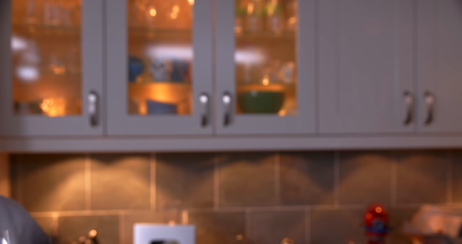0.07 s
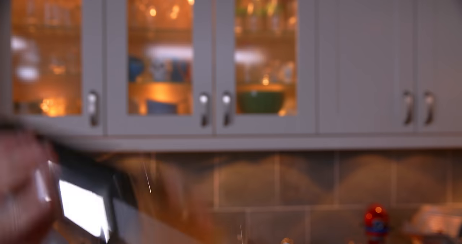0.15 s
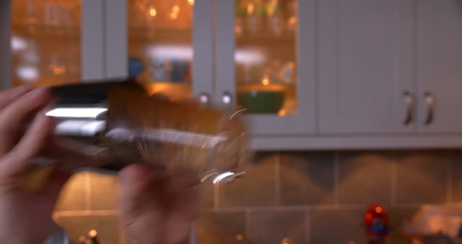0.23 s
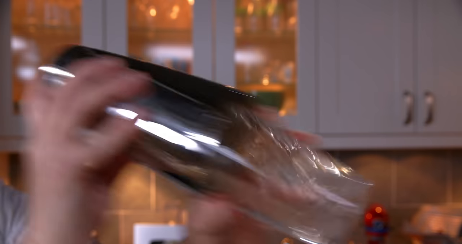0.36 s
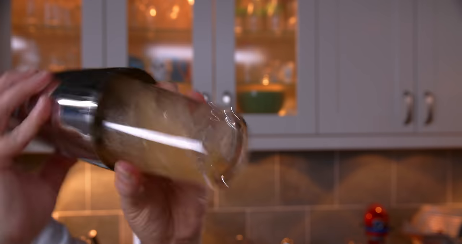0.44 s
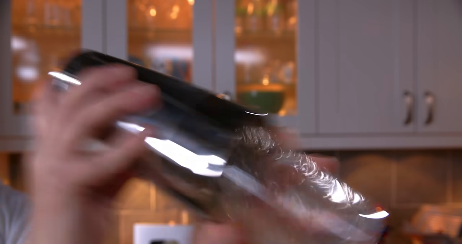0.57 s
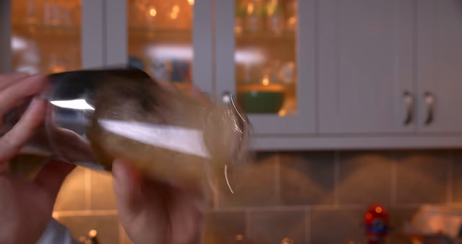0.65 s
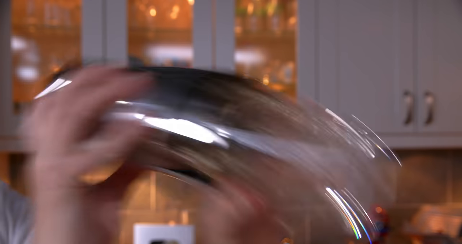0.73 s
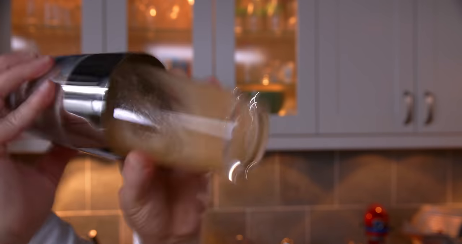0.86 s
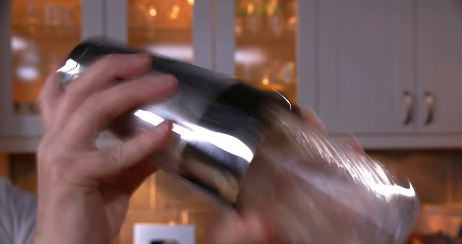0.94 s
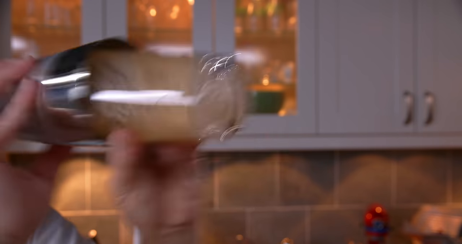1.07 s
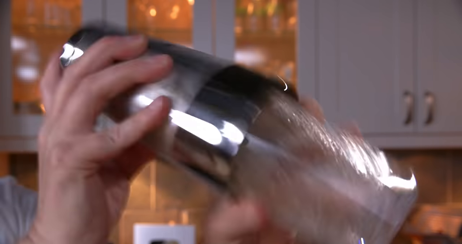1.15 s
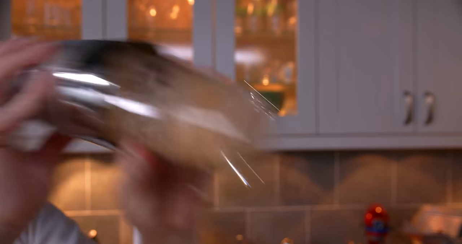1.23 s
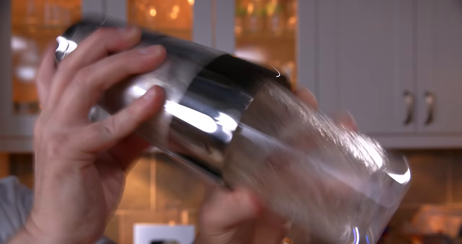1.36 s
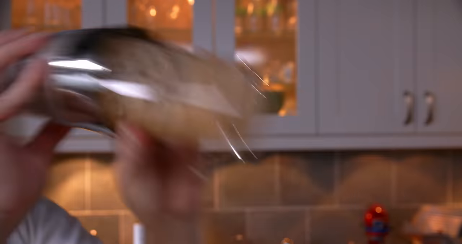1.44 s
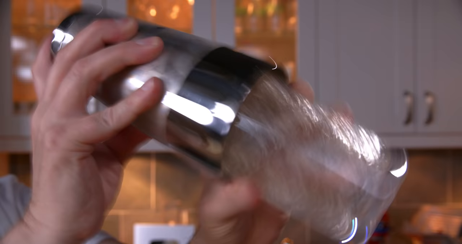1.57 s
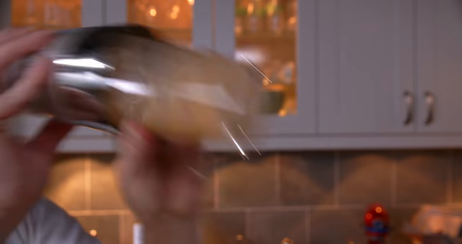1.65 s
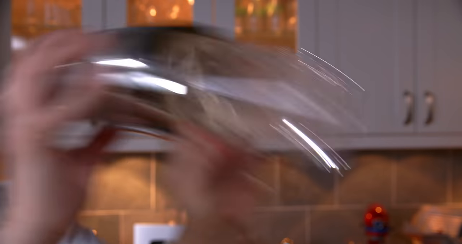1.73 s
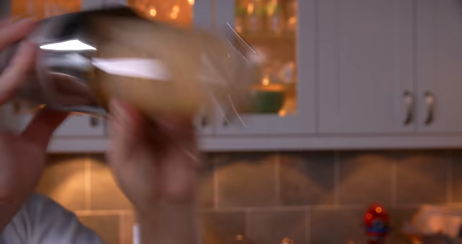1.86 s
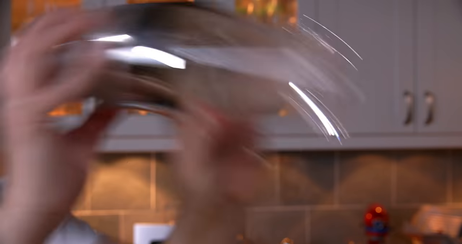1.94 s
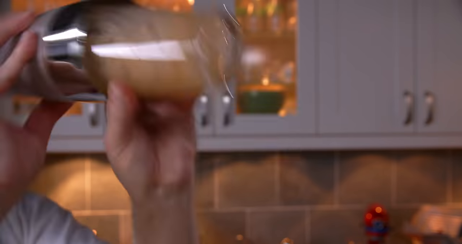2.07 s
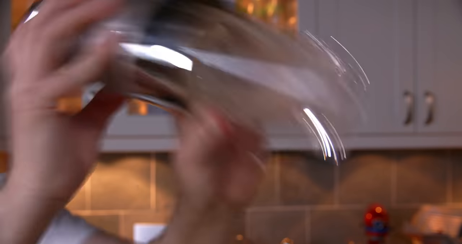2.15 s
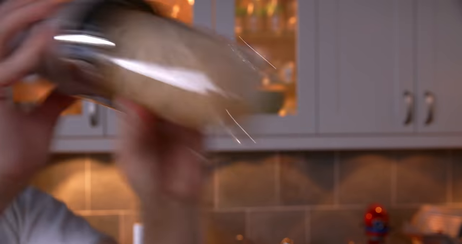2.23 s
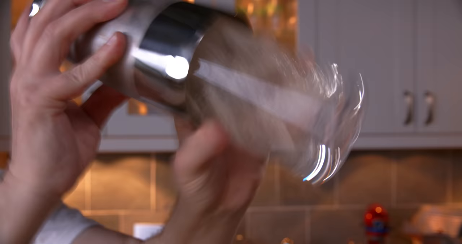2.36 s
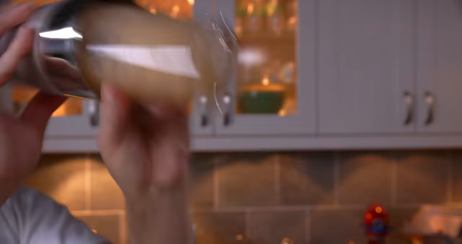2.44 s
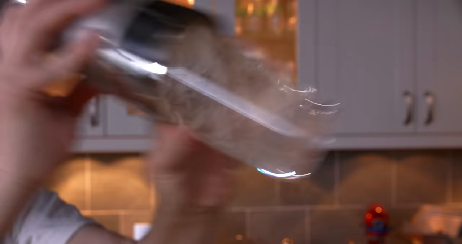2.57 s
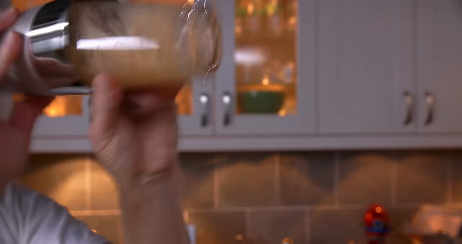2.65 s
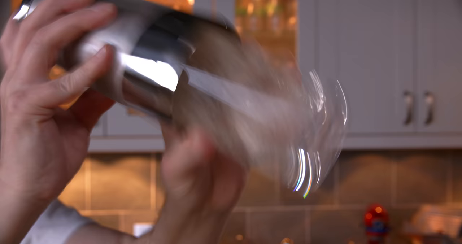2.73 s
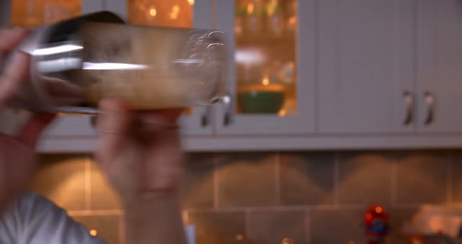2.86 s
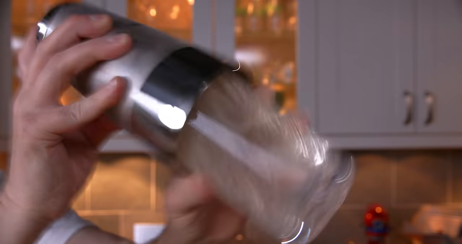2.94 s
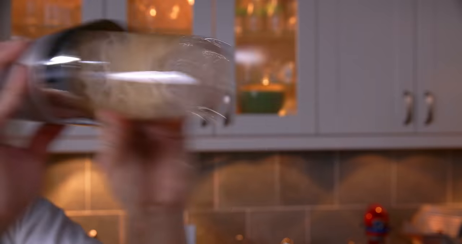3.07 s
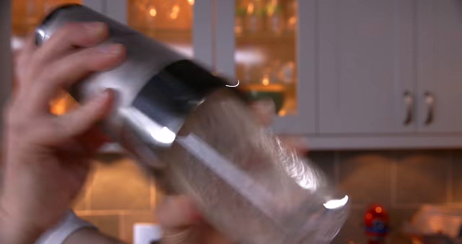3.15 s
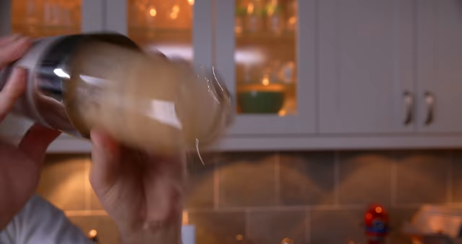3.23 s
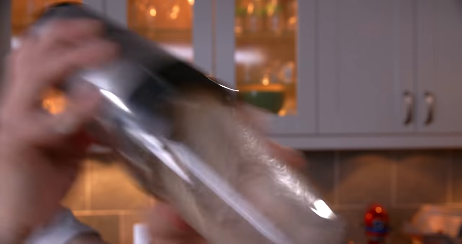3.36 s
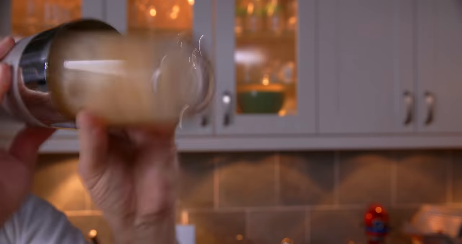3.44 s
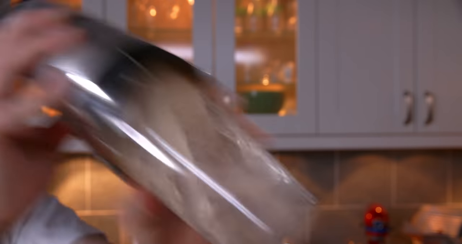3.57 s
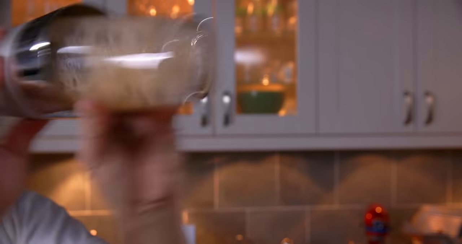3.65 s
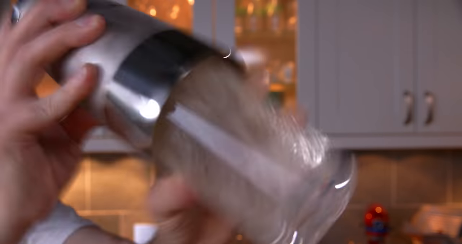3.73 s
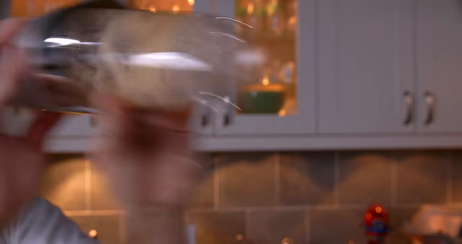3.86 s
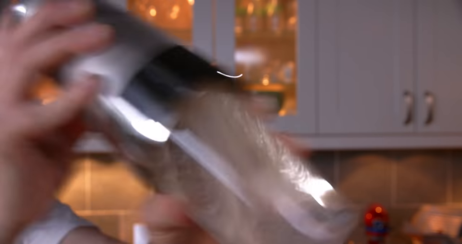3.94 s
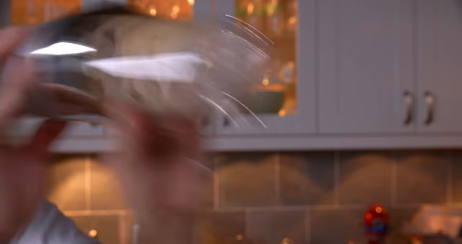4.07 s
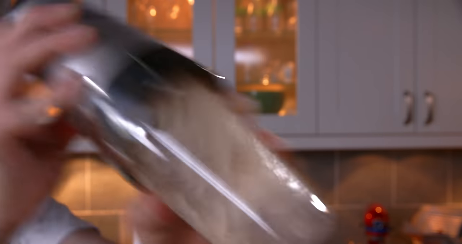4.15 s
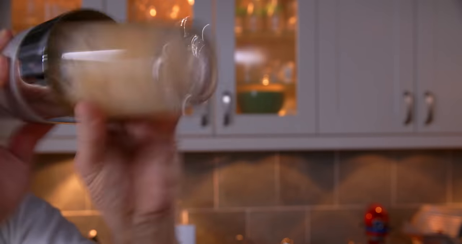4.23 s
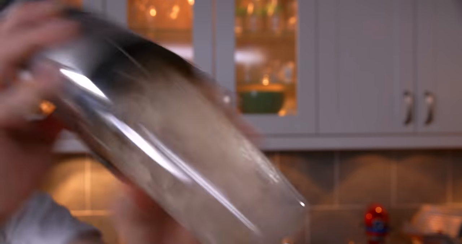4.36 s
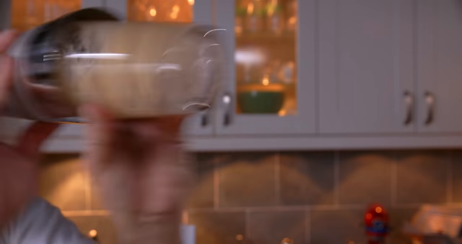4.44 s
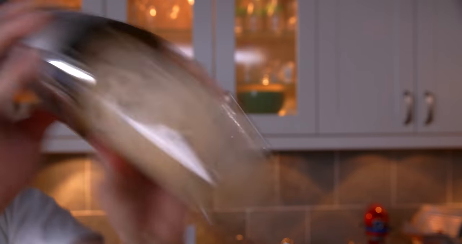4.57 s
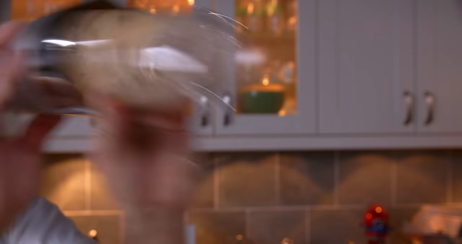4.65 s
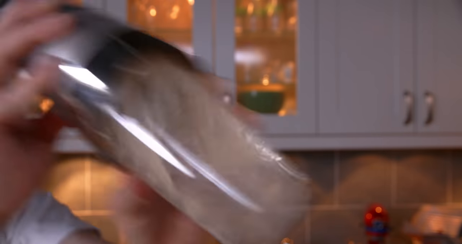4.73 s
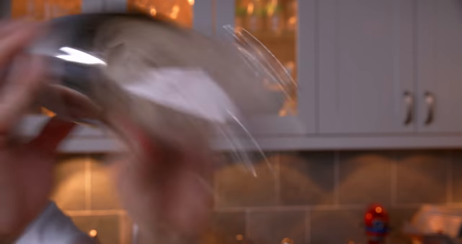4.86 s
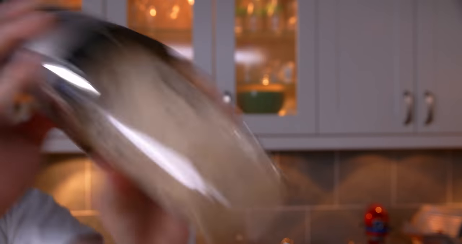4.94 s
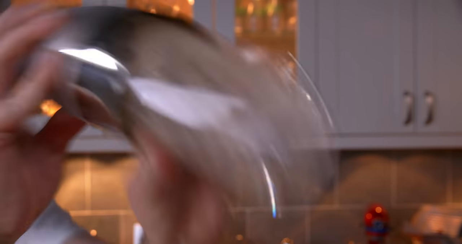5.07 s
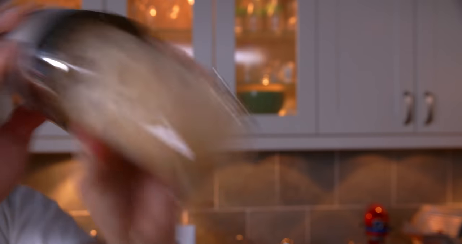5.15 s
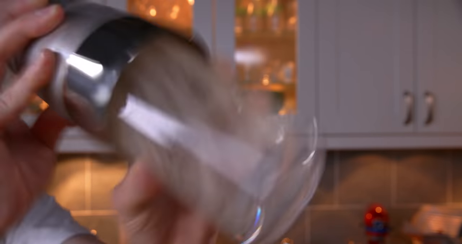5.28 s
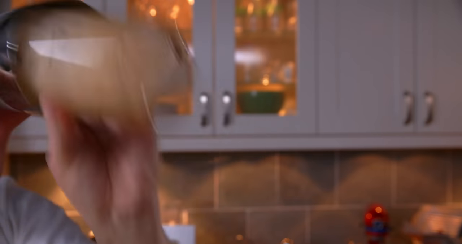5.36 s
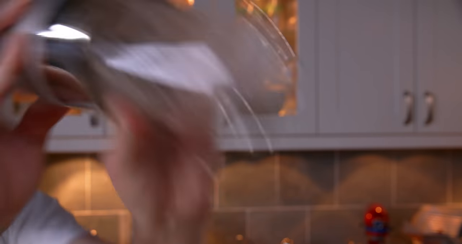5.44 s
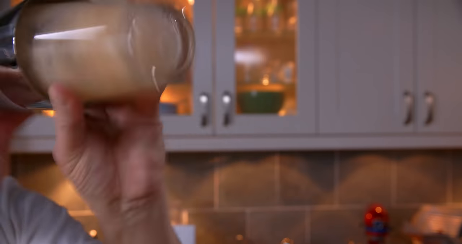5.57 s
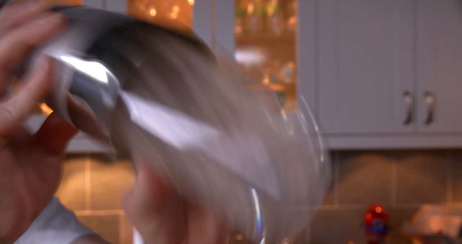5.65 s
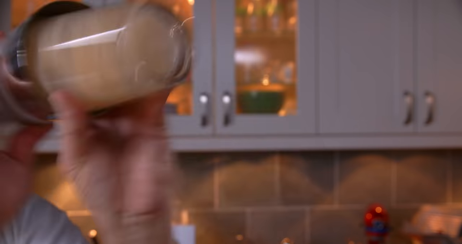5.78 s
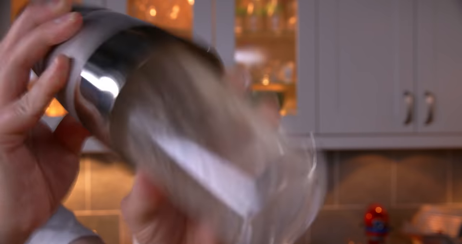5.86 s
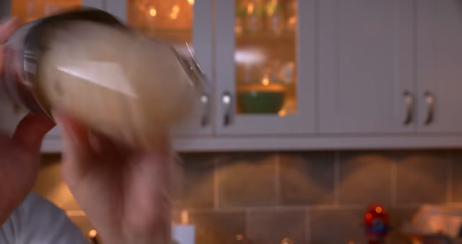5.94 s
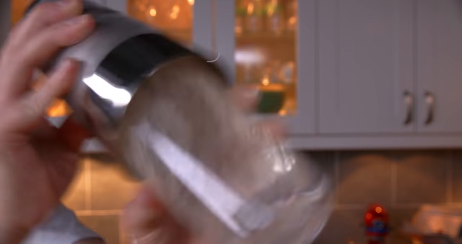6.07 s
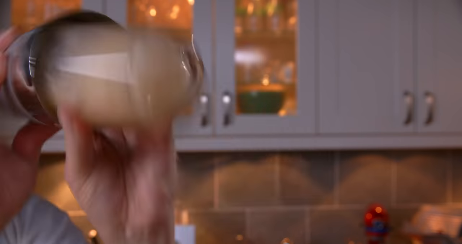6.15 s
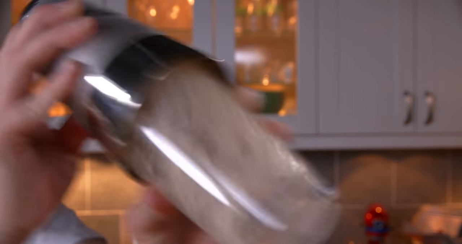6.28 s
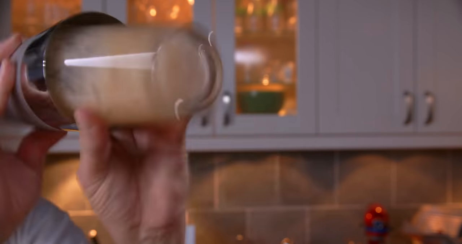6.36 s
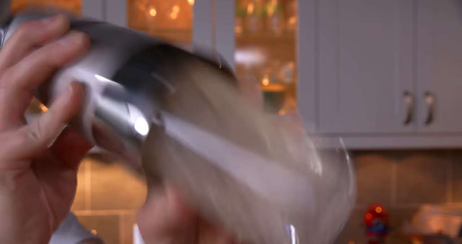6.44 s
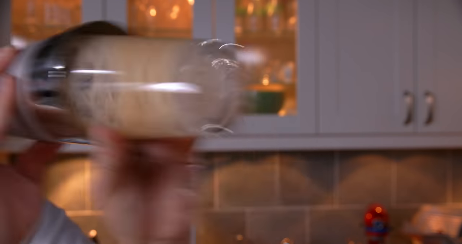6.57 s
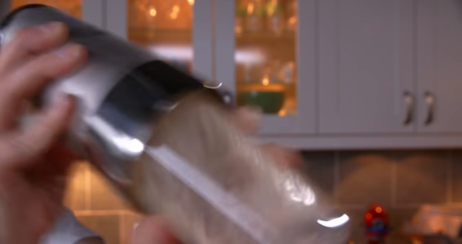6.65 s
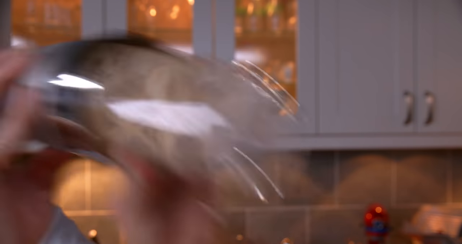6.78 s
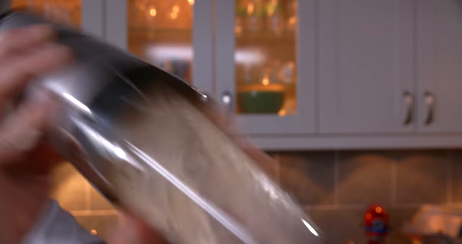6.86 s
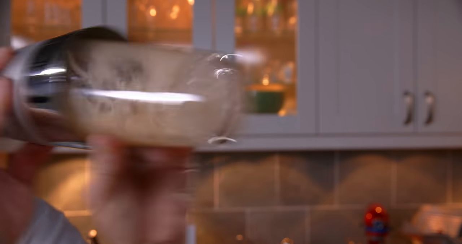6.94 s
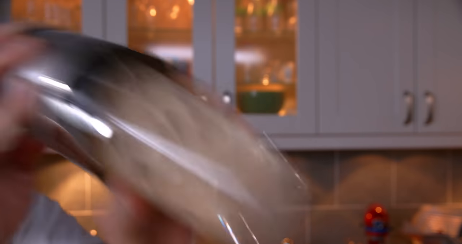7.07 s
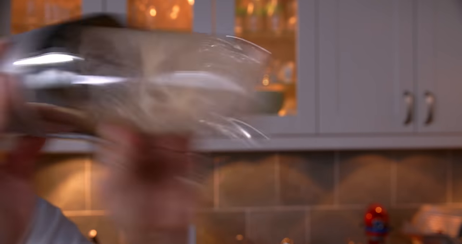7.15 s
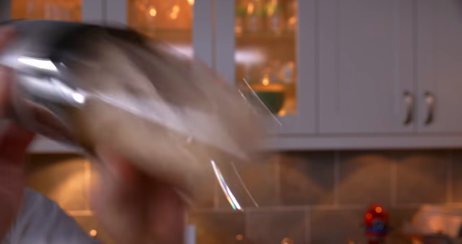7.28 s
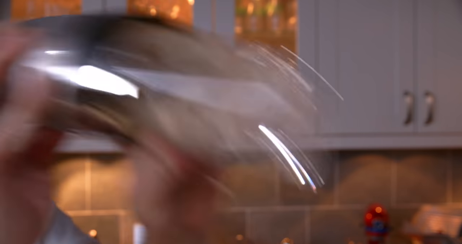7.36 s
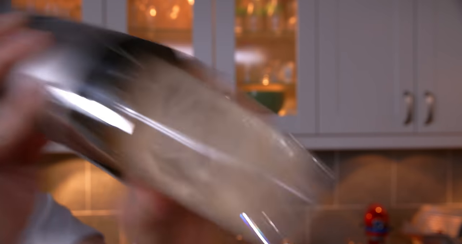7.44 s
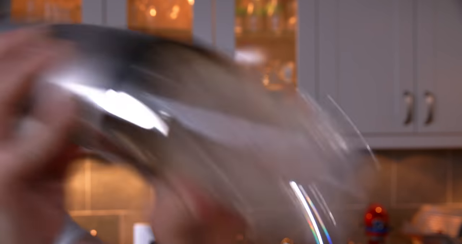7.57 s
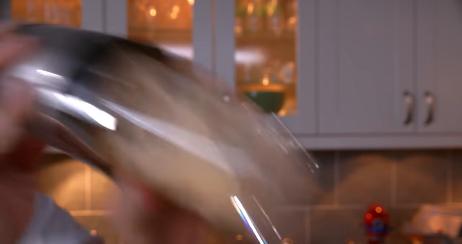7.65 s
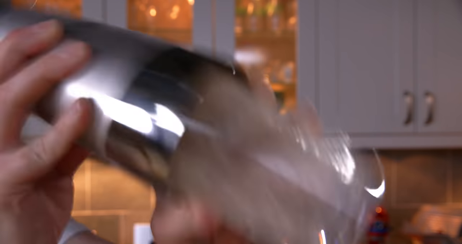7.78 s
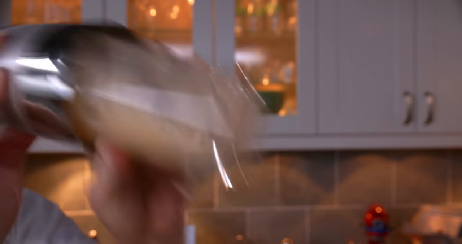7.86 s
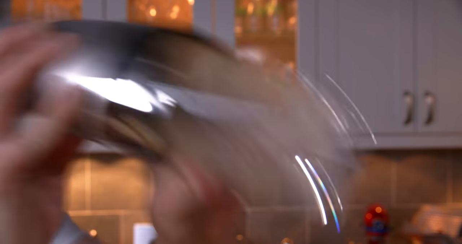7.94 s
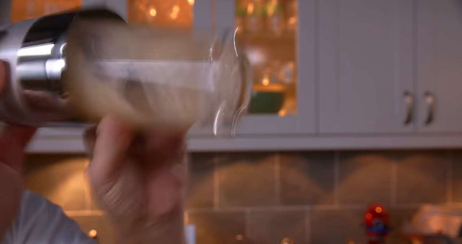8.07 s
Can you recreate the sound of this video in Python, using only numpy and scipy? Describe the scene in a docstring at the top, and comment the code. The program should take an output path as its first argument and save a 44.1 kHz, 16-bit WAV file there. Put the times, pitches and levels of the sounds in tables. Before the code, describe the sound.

After a brief quiet and a few loose slides, ice and liquid slam rapidly end to end in a hand-shaken cocktail shaker, dry and close.

```python
"""In a quiet kitchen, ice and drink are thrown from end to end of a shaker of steel tin and mixing glass,
five times a second. Each throw is a swell of small ice contacts that excite the damped modes of the walls,
with hard knocks and dull clunks as separate blows. Bands of flickering noise form the rush of the drink
and the room tone, low noise and damped 76 Hz thuds form the air moved by the arms, and feedback delays
form the reverberation."""
import sys
import numpy as np
from scipy import signal
from scipy.io import wavfile

SR = 44100
rng = np.random.default_rng(int(sys.argv[2]) if len(sys.argv) > 2 else 0)


def linear_from_db(decibels):
    """Turn decibels (scalar or array-like) into linear amplitude factors; 0 gives 1."""
    return 10 ** (np.asarray(decibels, float) / 20)


def persist_wave(psi):
    """Save psi, clipped to +-1, as 16-bit WAV."""
    counts = np.round(np.clip(psi, -1, 1) * 32767).astype(np.int16)
    wavfile.write(sys.argv[1], SR, np.atleast_2d(counts).T)


N = 357651

# Background noise of the room. Each row: frequency in Hz, relative density in dB per Hz.
ROOM_TONE = [(24, -60), (40, -22), (211, -6.5), (888, -22.5), (1460, -23), (2170, -22), (7870, -27),
             (15000, -44)]
ROOM_TONE_DB = -58.5
KITCHEN_T60_S, KITCHEN_CUT_HZ = 0.13, 6500

# Throws into the glass, hard and bright. Each row: start in seconds, level in dB in the lull before,
# level in dB at full rattle, rise in seconds. The levels are relative, shared by ice and drink.
FORWARD_THROWS = [(.41, -34, -15.5, .03), (.616, -34, -18.5, .04), (.817, -28, -15.5, 0.028),
                  (1.02, -26.5, -20, .02), (1.207, -32, -17.5, .035), (1.414, -29, -19.5, .025),
                  (1.629, -35.5, -16, 0.023), (1.832, -31.5, -15.5, .029), (2.034, -33.5, -17.5, .03),
                  (2.216, -30, -17.5, .053), (2.413, -34, -18, .029), (2.609, -34.5, -19, .033),
                  (2.797, -27.5, -18.5, .045), (2.993, -34, -19.5, .037), (3.205, -29.5, -19.5, 0.041),
                  (3.4, -27.5, -20, .04), (3.599, -32, -18, .021), (3.777, -28.5, -18, 0.053),
                  (3.986, -29, -18, .05), (4.176, -27.5, -19.5, .034), (4.378, -29.5, -16.5, 0.042),
                  (4.568, -30.5, -18.5, 0.023), (4.761, -28, -21, .028), (4.959, -29, -20.5, .026),
                  (5.145, -34.5, -21.5, 0.02), (5.335, -27.5, -19, 0.044), (5.529, -30, -18.5, 0.035),
                  (5.711, -31, -19, 0.064), (5.912, -31, -19, .055), (6.102, -28, -22.5, .042),
                  (6.307, -29.5, -18, .042), (6.511, -32.5, -22, .026), (6.681, -33.5, -21, .055),
                  (6.887, -27.5, -20, .045), (7.077, -32, -18.5, 0.037), (7.266, -35, -19, 0.023),
                  (7.445, -32, -20.5, .045), (7.639, -30, -21, .045), (7.83, -30.5, -23.5, .04),
                  (8.022, -31.5, -23, .045)]
FORWARD_HOLD_S, FORWARD_LOW_DB = .036, -9   # low body re high ring
# Throws back into the tin, softer and duller. Each row: start in seconds, level in dB in the lull before,
# level in dB at full rattle, relative level in dB of the push in the bass.
BACK_THROWS = [(.534, -33, -23.5, -76), (.742, -29.5, -21.5, -66), (.941, -29, -22, -64),
               (1.134, -31, -18.5, -57), (1.332, -30, -18.5, -59), (1.522, -30, -20, -58),
               (1.744, -33, -19.5, -61), (1.944, -29.5, -24, -53), (2.15, -30.5, -23.5, -61),
               (2.326, -27, -23.5, -58), (2.529, -28.5, -22, -53), (2.706, -31.5, -21.5, -51),
               (2.918, -32, -24.5, -58), (3.122, -28, -22.5, -56), (3.33, -28, -22.5, -60),
               (3.513, -28.5, -22, -62), (3.721, -28, -21.5, -55), (3.9, -28, -23.5, -58),
               (4.105, -29, -25, -56), (4.3, -31, -22.5, -54), (4.506, -29, -22, -56),
               (4.671, -28, -24, -59), (4.87, -29.5, -24.5, -52), (5.066, -34, -26, -51),
               (5.257, -36, -23, -48), (5.44, -28.5, -23.5, -48), (5.649, -30.5, -23, -55),
               (5.833, -32.5, -24, -62), (6.031, -31, -25.5, -62), (6.237, -29.5, -27, -50),
               (6.43, -35, -25.5, -62), (6.617, -30, -23, -52), (6.808, -31.5, -23.5, -55),
               (6.988, -32, -23.5, -54), (7.186, -32, -24, -52), (7.376, -34, -25, -60),
               (7.562, -30, -25, -48), (7.746, -29, -26, -58), (7.941, -29, -25, -54)]
BACK_RISE_S, BACK_HOLD_S, BACK_LOW_DB = .017, .036, -4.5
PUSH_LAG_S = .015
# First loose slides before the shaking is under way. Each row: time in seconds, relative level in dB.
LEAD_IN = [(0, -62), (0.084, -72.5), (0.149, -44), (.175, -43), (.21, -54), (.245, -38), (.295, -40),
           (.314, -27.5), (.34, -34), (.353, -18.5), (.366, -18), (0.397, -32.5)]
LEAD_IN_LOW_DB = -7   # low body re high ring

# Rush of drink and ice chips. Each row: frequency in Hz, relative density in dB per Hz.
RUSH = [(15, -63), (25, -18), (270, -19.5), (439, -45), (624, -18.5), (1440, -10.5), (1890, -9.5),
        (2160, -1.5), (3340, 1.5), (3820, -2.5), (9320, 0), (12900, -14), (16000, -15)]
# First slide of a cube along the glass. Each row: time in seconds, level in dB.
SLIDE = [(0.201, -64), (.235, -48), (.27, -47), (.3, -49), (.33, -78)]
# Notes that the slide rubs out. Each row: frequency in Hz, relative level in dB, t60 in seconds.
SLIDE_NOTES = [(1500, -12, .02), (2500, -0.5, .022), (3330, 0, .022)]

# Wall modes of tin and glass, damped by hands and drink.
# Each row: frequency in Hz, relative level in dB, t60 in seconds.
WALL_MODES = [(330, -12.5, 0.056), (470, -7.5, 0.015), (592, -13, 0.027), (820, -33, 0.11),
              (912, 1.5, 0.03), (1229, 5.5, 0.017), (1450, 15, 0.012), (1850, 15, 0.014),
              (2454, -9.5, 0.068), (2762, 0.5, 0.024), (3160, 6, 0.015), (3420, 4, 0.026),
              (3730, 3.5, 0.011), (4180, 9, 0.0068), (4954, 7, 0.0096), (5400, -1.5, 0.022)]
MODE_WANDER = 0.033   # the moving drink shifts a mode by about this share of its pitch
LOW_BODY_HZ, RADIATES_ABOVE_HZ = 2200, 390
# Breaking and scraping ice. Each row: frequency in Hz, relative density in dB per Hz.
CRACK = [(3240, 14.5), (5500, 6.5), (5800, 13), (9530, 6), (15100, -11), (16000, -24)]
CRACK_HZ, BLUNT_HZ = 5000, 12100   # a whole cube cracks duller than the chips

# Hardest knocks of ice. Each row: time in seconds, nominal peak in dB, strongest ring in Hz,
# crack in dB re the peak.
KNOCKS = [(0.1672, -19, 3030, -32), (0.3136, -10.5, 3550, -28), (0.3388, -11, 2900, -11),
          (0.353, -6, 4250, -16), (0.3627, -2.5, 2980, -9), (0.4264, 2, 3530, -11.5), (0.467, 2, 3300, -21),
          (0.5176, -8, 3260, -13), (0.547, -6, 3260, -10), (0.5747, -16, 5260, -3),
          (0.6423, -14, 2790, -10), (0.6735, -20, 3610, -9), (0.6908, -5, 3460, -4), (0.7089, 1, 3350, -9),
          (0.7573, -10, 3280, -3), (0.7867, -9, 3080, -12), (0.8387, -10, 3440, -18),
          (0.8546, -5, 4900, -27), (0.8684, 1.5, 3440, -10), (0.9483, -8, 3210, -5),
          (0.9758, -4.5, 2900, -15), (1.0137, -12, 3380, -5), (1.0263, -5, 2900, -19),
          (1.097, -2.5, 3180, -22), (1.1548, -16, 3290, -9), (1.1694, -7, 3030, -4), (1.215, -9, 3360, -18),
          (1.2601, 0, 3260, -13), (1.297, -1.5, 3430, -10.5), (1.3425, -17, 3160, -7),
          (1.3798, -14, 2990, -1), (1.4288, -13, 3090, -10), (1.4465, -13, 3200, -10),
          (1.4549, 1.5, 3160, -10), (1.4706, -4.5, 3210, -3), (1.4912, 1, 3420, -10),
          (1.5246, -26, 3160, -1), (1.5386, -10, 3300, -0.5), (1.562, -7, 2900, -8),
          (1.5944, -2.5, 3150, -9), (1.6423, -12, 3200, -11), (1.6647, 1.5, 3220, -13),
          (1.7113, 0, 3430, -20), (1.753, -6, 2900, -24), (1.775, -15, 3190, -16), (1.801, -7, 2850, -16),
          (1.8419, -9, 4670, -3), (1.8552, -6, 4610, -6), (1.8724, -15, 3240, -4), (1.8893, 0.5, 3380, -14),
          (1.9503, -8, 3330, -13), (1.9701, -9, 3260, -3.5), (1.992, -1, 2850, -10), (2.039, -11, 3390, -5),
          (2.0776, -10, 3430, -6), (2.0893, 0, 3410, -15), (2.1354, -3.5, 3230, -22),
          (2.1664, -4, 3170, -15), (2.246, -9, 3200, -12), (2.2577, -15, 3270, -15),
          (2.2727, -11, 3380, -10), (2.3723, -20, 3920, -2), (2.389, -10.5, 5400, 0),
          (2.4173, -18, 3350, -7), (2.434, -10.5, 3250, -2), (2.466, -8.5, 3380, -12),
          (2.5554, -10.5, 2860, -10), (2.627, -6.5, 3320, -7), (2.677, 1, 2470, -21),
          (2.73, -15, 3930, -9.5), (2.831, -12, 3470, -11), (2.8622, -1, 3330, -15),
          (2.9196, -14, 3420, -17), (2.9384, -13, 2800, -4), (2.9646, -13, 3160, -1),
          (3.0047, -6.5, 3190, -5), (3.0243, -10, 3280, -9), (3.0365, 2.5, 3390, -12),
          (3.1334, -10, 3170, -8), (3.213, -9, 3340, -8), (3.2256, -12, 3420, -14),
          (3.2396, -4.5, 3500, -11), (3.2584, 1.5, 3360, -17), (3.3355, -7.5, 3300, -11),
          (3.4103, -7, 3250, -10), (3.4228, -8.5, 3300, -7), (3.4565, -2.5, 5140, -8),
          (3.492, -17.5, 3300, -4), (3.53, -20, 3480, -14), (3.5909, -9, 4830, -10),
          (3.6173, -10, 3400, -11), (3.6592, -5.5, 2790, -11), (3.822, -2, 3470, -20),
          (3.8522, -2, 3430, -23), (3.9122, -8.5, 3700, -19), (3.9586, -9, 3980, -7),
          (3.999, -18, 3160, -5), (4.0332, -2.5, 3430, -16), (4.061, 1, 3360, -24), (4.1208, -12, 2940, -8),
          (4.1307, -11, 2980, -2.5), (4.192, -15, 3180, -1), (4.22, -4, 3090, -7.5), (4.27, -13, 5210, -9),
          (4.2806, -5.5, 3260, -10), (4.311, -7, 2920, -9), (4.3316, -10, 4460, -5),
          (4.3918, -5, 3050, -14), (4.3918, -2.5, 3530, -35), (4.419, -6, 3330, -20),
          (4.434, -2, 3500, -11), (4.5248, -18, 3340, -15), (4.5747, -12, 4100, -17),
          (4.5976, -12, 3280, -16), (4.6355, -2.5, 5000, -8), (4.6697, -7, 3450, -11),
          (4.7856, -12, 3230, -10), (4.8268, -1.5, 3320, -14), (4.9997, -5, 3300, -15),
          (5.0164, -6, 3770, -13), (5.0422, -3.5, 5300, -12.5), (5.0735, -14, 3260, -17),
          (5.0953, -9, 3170, -9), (5.1565, -6.5, 3080, -10), (5.1877, -9, 3210, -2),
          (5.2096, 3.5, 4220, -15), (5.2786, -19, 3170, -14), (5.343, -10, 3270, -13),
          (5.3644, -12, 3430, -10), (5.392, -6, 3250, -6), (5.4465, -11, 3100, -14),
          (5.5485, -13, 5500, -10), (5.5877, -1.5, 4030, -7), (5.6404, -11, 3370, -18),
          (5.665, -7, 2910, -16), (5.6831, -15, 3080, -4), (5.748, -7.5, 3420, -7), (5.7657, -6, 3100, -17),
          (5.9301, -3, 3360, -15), (5.9803, 3, 3300, -21), (6.0348, -16, 3390, -11),
          (6.0568, -10, 3260, -8), (6.126, -12, 3390, -3), (6.1442, -10, 3370, -13),
          (6.177, -2.5, 5320, -12), (6.208, -6, 3530, -30.5), (6.3302, -18, 5470, 5),
          (6.3581, -6, 3240, -10), (6.387, 1, 3200, -17), (6.456, -10.5, 3290, -13),
          (6.5237, -10, 3180, -4), (6.5776, -4.5, 5140, -8), (6.625, -8.5, 3440, -11),
          (6.709, -13.5, 4540, -2), (6.724, -13, 3280, -7), (6.7502, -1, 3340, -24),
          (6.7801, -6, 4020, -19), (6.8282, -5.5, 3360, -11), (6.9024, -9.5, 2640, -10),
          (6.9211, -5, 2360, -8), (6.992, -6.5, 3380, -30), (7.0898, -6, 3300, -16), (7.108, -12, 3180, -7),
          (7.125, -0.5, 2330, -14), (7.1863, -8, 3330, -16), (7.292, -19, 3430, -10),
          (7.3133, -16, 3430, -11), (7.4, -8.5, 3270, -15), (7.4747, -9, 3480, -21),
          (7.487, -8.5, 3970, -7), (7.6644, -17, 4500, -7), (7.6783, -4.5, 3290, -8),
          (7.7201, -9, 5070, -12), (7.793, -11, 4080, -8), (7.8694, -13, 3420, -4), (7.953, -13, 3590, -18),
          (7.9678, -16, 3030, -4), (8.0064, -13, 3310, -22), (8.046, -13, 3300, -8),
          (8.0967, -3.5, 3300, -13)]
BODY_DB, RING_DB = -30.5, -14.5   # low body and high ring of a knock: rms of the first 4 ms re its peak
# Dull clunks, knocks on the end of the tin so that a low wall note speaks. # Each row: time in seconds, nominal
# peak in dB, note in Hz.
CLUNKS = [(0.353, -11, 1600), (0.427, -27, 1860), (0.547, -18, 1710), (0.638, -35, 1910),
          (0.658, -25, 1870), (0.69, -37, 2000), (0.759, -23, 1500), (0.836, -20, 1880),
          (0.893, -16.5, 1550), (0.956, -27, 1470), (1.062, -16, 1980), (1.145, -13.5, 1520),
          (1.17, -19, 1560), (1.285, -20, 1920), (1.341, -22, 1770), (1.365, -19, 896), (1.49, -17, 1785),
          (1.593, -15, 1530), (1.659, -13, 1914), (1.671, -14, 1970), (1.7, -13, 1800), (1.753, -22, 1755),
          (1.777, -10, 1470), (1.842, -12.5, 2020), (1.854, -13, 1400), (1.883, -31, 1494),
          (1.999, -10.5, 1450), (2.047, -16.5, 1510), (2.066, -21, 1485), (2.09, -20, 1850),
          (2.136, -20.5, 1920), (2.166, -14.5, 1300), (2.284, -19.5, 1840), (2.374, -13.5, 1480),
          (2.386, -15, 1490), (2.465, -16, 1720), (2.581, -14.5, 1410), (2.636, -19, 1980),
          (2.647, -11, 1810), (2.679, -14, 1500), (2.731, -22, 1770), (2.743, -17, 1660),
          (2.776, -16.5, 1750), (2.832, -17, 1520), (2.964, -13, 1510), (3.039, -12, 1860),
          (3.218, -15.5, 1420), (3.245, -18, 1900), (3.328, -21, 1860), (3.368, -20, 1450),
          (3.409, -15, 1320), (3.422, -20, 1810), (3.539, -19, 1465), (3.618, -20, 1410),
          (3.629, -14, 1280), (3.738, -15, 1400), (3.817, -22, 1760), (3.854, -13.5, 1860),
          (3.912, -31, 1740), (3.959, -14, 1900), (4.21, -15, 1850), (4.332, -10.5, 1280),
          (4.392, -19, 1410), (4.428, -10.5, 1810), (4.499, -35, 1750), (4.527, -22, 1284),
          (4.575, -25, 1560), (4.71, -28, 1900), (4.79, -22, 1380), (4.826, -12.5, 1440),
          (4.974, -18, 1800), (5.006, -17.5, 1310), (5.034, -20.5, 1850), (5.073, -39, 1880),
          (5.104, -18, 1920), (5.156, -22, 1500), (5.188, -12, 1820), (5.279, -35, 1650),
          (5.298, -15.5, 1290), (5.548, -21, 1430), (5.565, -17, 1470), (5.587, -11, 1810),
          (5.669, -11, 1770), (5.742, -20, 1330), (5.929, -18, 1760), (5.947, -12, 1450), (5.98, -9, 1410),
          (6.034, -19.5, 1280), (6.068, -11.5, 1860), (6.143, -11, 1820), (6.256, -28, 1930),
          (6.332, -21, 1310), (6.365, -32, 1860), (6.446, -29, 1260), (6.534, -21, 2050),
          (6.547, -13.5, 1290), (6.724, -22, 1350), (6.738, -17, 1400), (6.75, -11.5, 2060),
          (6.82, -14.5, 1820), (6.913, -11, 1800), (6.92, -15, 1850), (6.965, -14.5, 1450),
          (6.993, -16, 1700), (7.017, -21, 1760), (7.242, -18, 1120), (7.291, -29, 1900),
          (7.388, -22, 1400), (7.407, -19, 1160), (7.467, -27, 1310), (7.486, -22, 1870),
          (7.507, -12, 1610), (7.678, -15, 1850), (7.782, -25, 1310), (7.83, -19.5, 1230),
          (7.883, -20.5, 1440), (7.905, -15, 1880), (8.006, -22, 1230), (8.039, -19, 1290),
          (8.085, -19, 1510)]
# Parts of a clunk. The row: low body, high ring and crack, each in dB re the peak.
CLUNK_DB = (-10, -17, -30)
# Parts of a lesser knock. The row: low body, high ring and crack, each in dB re the throw level.
LESSER_DB = (-16.5, -8.5, -12)
# Chance variation of those parts. The row: low body, high ring and crack, each a spread in dB.
LESSER_SCATTER_DB = (6.5, 1, 8)
LESSER_COUNT, LESSER_FOLLOWS = 80, .6   # the odds follow the throw level in dB times this factor


def rms_one(x):
    """Normalisation divides a signal by its root mean square."""
    return x / np.sqrt(np.mean(x ** 2) + 1e-20)


def above(hz, x):
    """A fourth-order high-pass models weak radiation at low frequencies."""
    return signal.sosfilt(signal.butter(4, hz, "high", fs=SR, output="sos"), x)


def band_pass(low_hz, high_hz, x):
    """A second-order Butterworth design selects one band."""
    return signal.sosfilt(signal.butter(2, [low_hz, high_hz], "band", fs=SR, output="sos"), x)


def drift(rate_hz):
    """Noise through two equal one-poles is a slow random process, here of rms 1."""
    pole = np.exp(-40 * np.pi * rate_hz / SR)   # computed at every 20th sample
    white = rng.standard_normal(N // 20 + 2002)
    slow = signal.lfilter([1], [1, -2 * pole, pole * pole], white)[2000:]   # settled part
    return np.interp(np.arange(N) / 20, np.arange(len(slow)), rms_one(slow))


def ring(drive, hz, t60):
    """A damped resonator answers a unit impulse with a decaying sine of initial height 1."""
    radius, angle = linear_from_db(-60 / (t60 * SR)), 2 * np.pi * hz / SR
    feedback = [1, -2 * radius * np.cos(angle), radius * radius]
    return signal.lfilter([0, np.sin(angle)], feedback, drive + 1e-18)


def banded_noise(spectrum, patchy_db):
    """Turbulence and friction are noise in half-octave bands, each with its own flicker; rms 1."""
    out, edges = 0, 22 * 2 ** np.arange(0, 10, .5)
    hz, density_db = np.transpose(spectrum)
    white, together = rng.standard_normal((2, N)), drift(120)
    for k, (low, high) in enumerate(zip(edges, edges[1:])):
        band = band_pass(low, high, white[k % 2])
        centre_db = np.interp(np.log(low * high) / 2, np.log(hz), density_db)
        flicker_db = patchy_db * (0.17 * together + drift(32))
        out = out + band * linear_from_db(centre_db + flicker_db)
    return rms_one(out)


def room_tone():
    """A quiet room has steady background noise that is strongest at low frequencies."""
    return linear_from_db(ROOM_TONE_DB) * banded_noise(ROOM_TONE, patchy_db=.8)


def kitchen(x):
    """Reverberation is recirculating delay: eight loops, each duller on every round."""
    out, pole = np.zeros(N), np.exp(-2 * np.pi * KITCHEN_CUT_HZ / SR)
    lags = (np.geomspace(.011, .031, num=8) * SR).astype(int)
    for k, lag in enumerate(lags):
        loop, gain, state = x.copy(), linear_from_db(-60 * lag / SR / KITCHEN_T60_S), [0.]
        for i in range(lag, N, lag):   # one round of the loop at a time
            back, state = signal.lfilter([gain * (1 - pole)], [1, -pole], loop[i - lag:i], zi=state)
            loop[i:i + lag] += back[:N - i]
        out += (loop - x) * (-1) ** k
    return out


def throws():
    """The excitation of a thrown load rises from a lull, holds and falls to the next lull."""
    rows = [(*row, FORWARD_HOLD_S, FORWARD_LOW_DB) for row in FORWARD_THROWS]
    rows += [(*row[:3], BACK_RISE_S, BACK_HOLD_S, BACK_LOW_DB) for row in BACK_THROWS]
    start, lull_db, full_db, rise, hold, low_db = np.transpose(sorted(rows))
    s, (lead_s, lead_db) = np.arange(N) / SR, np.transpose(LEAD_IN)
    throw_s = np.ravel([start, start + rise, start + rise + hold], "F")
    throw_db = np.ravel([lull_db, full_db, full_db], "F")
    corners = np.maximum.accumulate(np.r_[lead_s, throw_s])   # keeps the corners in order of time
    level_db = np.interp(s, corners, np.r_[lead_db, throw_db])
    middle_s = start + rise + hold / 2
    low_body_db = np.interp(s, np.r_[lead_s[-1], middle_s], np.r_[LEAD_IN_LOW_DB, low_db])
    return level_db, low_body_db


def air_push(level_db, thud_db):
    """Swinging arms stir low air as noise; each backward throw starts with a push that excites a damped low
    resonance."""
    start, push_db = np.array(BACK_THROWS)[:, 0], np.array(BACK_THROWS)[:, 3]
    pushes = np.zeros(N)
    pushes[((start + PUSH_LAG_S) * SR).astype(int)] = linear_from_db(push_db)
    thuds = linear_from_db(thud_db) * ring(pushes, hz=76, t60=0.045)
    soft = signal.sosfilt(signal.butter(2, 130, fs=SR, output="sos"), thuds)
    low = band_pass(22, 160, rng.standard_normal(N))
    moving = np.clip((np.arange(N) / SR - .3) / 0.96, 0, 1)   # the arms get under way
    return moving * linear_from_db(level_db + 2.5 * drift(3.8)) * rms_one(low) + soft


def drink_rush(level_db):
    """Flow noise grows with the force of the throw and drives a resonance of the glass."""
    rush = linear_from_db(level_db - 7) * banded_noise(RUSH, patchy_db=2.5)
    rush = rush * np.clip(linear_from_db(level_db + 31), .4, 1)   # weaker still while the load is thrown softly
    singing = linear_from_db(-39) * ring(rush, hz=3350, t60=0.035)
    return above(93, rush) + singing


def slide():
    """Rough friction is a random force that keeps a few wall notes sounding."""
    s, level_db = np.transpose(SLIDE)
    rub = rng.standard_normal(N) * linear_from_db(4.0 * drift(80))
    notes = sum(linear_from_db(note_db) * rms_one(ring(rub, hz, t60)) for hz, note_db, t60 in SLIDE_NOTES)
    envelope_db = np.interp(np.arange(N) / SR, s, level_db, left=-120, right=-120)
    return linear_from_db(envelope_db) * above(900, notes)


def crack(contacts, fade_s):
    """Fracture and scraping are broadband: every contact gates a short burst of bright noise."""
    gate = signal.lfilter([1], [1, -np.exp(-1 / (fade_s * SR))], contacts + 1e-18)
    bright = gate * banded_noise(CRACK, patchy_db=1.0)
    return above(CRACK_HZ, bright)


def rattle(level_db, low_db, per_s, spread_db, spot_db):
    """Clumped small impacts strike the walls at random spots, so each excites every mode differently."""
    at = np.flatnonzero(rng.random(N) < per_s * linear_from_db(3.0 * drift(40)) / SR)
    size_db = spread_db * np.minimum(rng.exponential(1, N), 3)[at]
    low, high, contacts = np.zeros(N), np.zeros(N), np.zeros(N)
    for hz, mode_db, t60 in WALL_MODES:
        clicks = np.zeros(N)
        share_db = mode_db + spot_db * rng.standard_normal(N)[at]
        clicks[at] = linear_from_db(size_db + share_db) * rng.choice([-1, 1], N)[at]
        dealt = rng.integers(-1, 2, N)   # each contact finds the mode low, centred or high
        rung = sum(ring(clicks * (dealt == k), hz * (1 + k * MODE_WANDER), t60) for k in (-1, 0, 1))
        if hz < LOW_BODY_HZ:
            low = low + rung
        else:
            high = high + rung
    contacts[at] = linear_from_db(size_db + 5.5 * rng.standard_normal(N)[at])
    high_ring = rms_one(above(1680, high))
    low_body = linear_from_db(low_db) * rms_one(low)
    chips = linear_from_db(-0.5) * rms_one(crack(contacts, fade_s=0.00053))
    return linear_from_db(level_db) * (high_ring + low_body + chips)


def knock_rows(level_db):
    """Impacts differ in body, ring and crack: listed knocks and clunks, and chance blows where throws peak.

    Each row: time in seconds, ring in Hz, low body in dB, high ring in dB, crack in dB."""
    s, peak_db, ring_hz, crack_db = np.transpose(KNOCKS)
    hard = np.transpose([s, ring_hz, peak_db + BODY_DB, peak_db + RING_DB, peak_db + crack_db])
    s, peak_db, note_hz = np.transpose(CLUNKS)
    dull = np.column_stack([s, note_hz, peak_db[:, None] + CLUNK_DB])

    odds = np.cumsum(linear_from_db(LESSER_FOLLOWS * level_db))
    where, which = rng.random((LESSER_COUNT, 2)).T
    drawn = (np.arange(LESSER_COUNT) + where) / LESSER_COUNT * odds[-1]   # one in each equal share of the odds
    at = np.searchsorted(odds, drawn).clip(0, N - 1)
    hz = np.array([hz for hz, _, _ in WALL_MODES if hz > 1000])
    lesser_hz = hz[(which * len(hz)).astype(int)]
    scatter_db = np.multiply(LESSER_SCATTER_DB, rng.standard_normal((LESSER_COUNT, 3)).clip(-2, 1))
    lesser = np.column_stack([at / SR, lesser_hz, level_db[at, None] + LESSER_DB + scatter_db])
    return np.vstack([lesser, hard, dull])


def knocks(rows, chatter_s, crack_s):
    """An impact is a blow and fading slips; modes near its strongest ring are excited most."""
    s, ring_hz, low_db, ring_db, crack_db = np.transpose(rows)[:, :, None]
    hz, mode_db, t60 = np.transpose(WALL_MODES)
    t, out, first = np.arange(1280) / SR, np.zeros(N + 4096), int(.004 * SR)
    mode_chance = rng.standard_normal((len(rows), len(WALL_MODES)))
    slip_chance = rng.standard_normal((len(rows), 256))

    hz = hz * (1 + MODE_WANDER * rng.standard_normal((len(rows), len(WALL_MODES))))
    nearest = np.abs(np.log(hz / ring_hz)).argmin(axis=1)
    hz[np.arange(len(hz)), nearest] = ring_hz[:, 0]   # the closest mode sits on the ring that is heard
    near_db = 13 * np.exp(-(np.log(hz / ring_hz) / .07) ** 2)
    share = linear_from_db(mode_db + near_db + 3.5 * mode_chance)
    decay = linear_from_db(-60 * t / t60[:, None])
    rings = share[:, :, None] * np.sin(2 * np.pi * hz[:, :, None] * t) * decay

    slips = slip_chance ** 3 * np.exp(-t[:256] / chatter_s)   # cubing leaves few strong slips
    slips[:, 0] = 12.0   # the blow itself
    blows = 0
    for modes, part_db, cut_hz in ((hz < LOW_BODY_HZ, low_db, 250), (hz >= LOW_BODY_HZ, ring_db, 1900)):
        chosen = np.einsum("km,kmt->kt", modes * 1., rings)
        part = signal.fftconvolve(chosen, slips, axes=1)
        part = above(cut_hz, part)   # a mode sends out little below its own range
        blows = blows + linear_from_db(part_db) * part / np.std(part[:, :first], axis=1, keepdims=True)
    at = (s[:, 0] * SR).astype(int)
    for start, blow in zip(at, blows):
        out[start:start + len(blow)] += blow

    contacts = np.zeros(N)
    contacts[at] = linear_from_db(crack_db[:, 0]) * np.sqrt(2 * first / (crack_s * SR))   # sets the rms over 4 ms
    blunt = signal.butter(1, BLUNT_HZ, fs=SR)
    return out[:N] + signal.lfilter(*blunt, crack(contacts, crack_s))


def scene():
    """Superposition adds ice, its reverberation, drink, moving air and room tone."""
    level_db, low_db = throws()
    small_ice = linear_from_db(-6.0) * rattle(level_db, low_db, per_s=800, spread_db=2.5, spot_db=5.5)
    blows = knocks(knock_rows(level_db), chatter_s=0.00092, crack_s=0.0017)
    ice = above(RADIATES_ABOVE_HZ, small_ice + slide() + blows)   # a small body sends out little bass
    air = air_push(level_db=-72, thud_db=7)
    mix = ice + linear_from_db(-13) * kitchen(ice) + drink_rush(level_db) + air + room_tone()
    return mix[None]   # one channel


def top_cut(x):
    """Nothing passes above the cut-off."""
    return signal.sosfilt(signal.butter(12, 16680, fs=SR, output="sos"), x)


def record(dry):
    """Soft saturation rounds the peaks and a steep low-pass ends the band at 16 kHz."""
    rounded = dry / (1 + (dry / .95) ** 6) ** (1 / 6)
    steep = signal.cheby2(24, 60, 16000, fs=SR, output="sos")
    finished = signal.sosfilt(steep, rounded)
    return top_cut(finished)


dry = scene()
out = record(dry)
persist_wave(out)
```